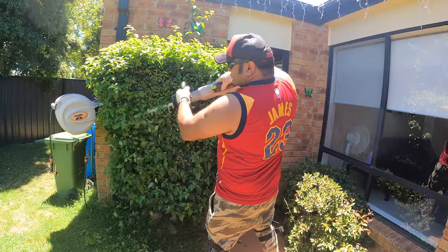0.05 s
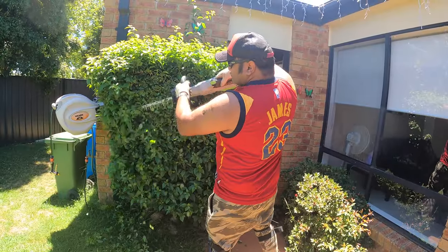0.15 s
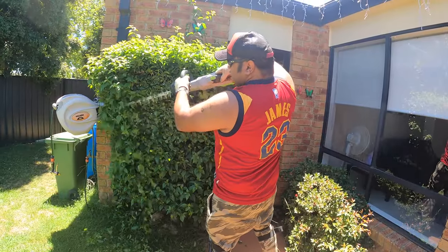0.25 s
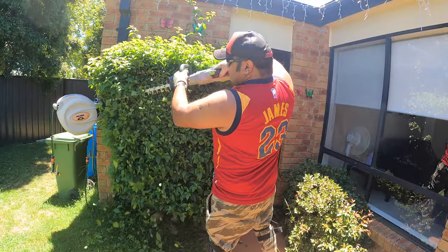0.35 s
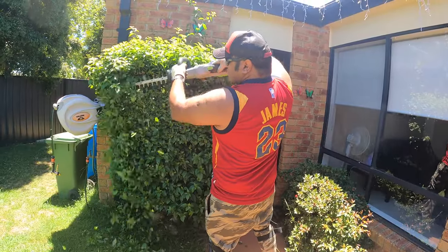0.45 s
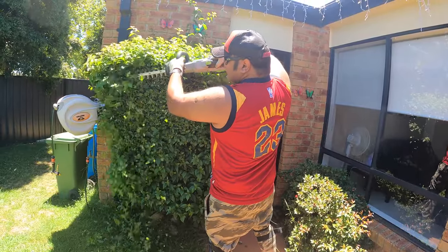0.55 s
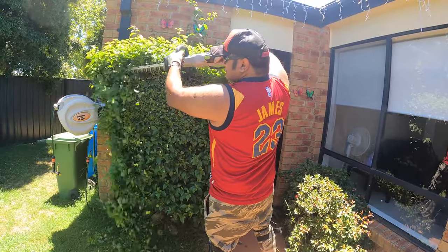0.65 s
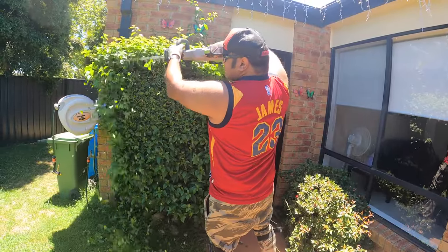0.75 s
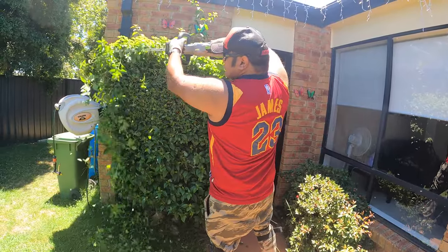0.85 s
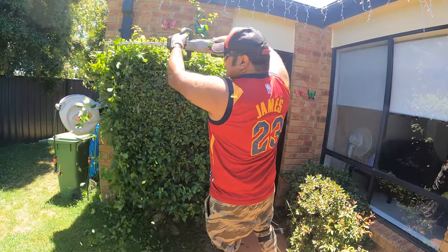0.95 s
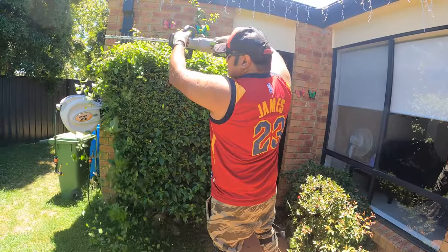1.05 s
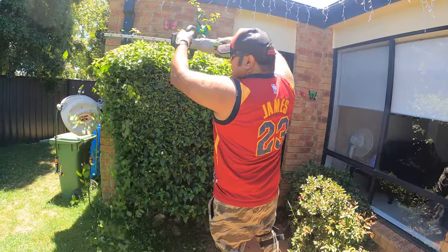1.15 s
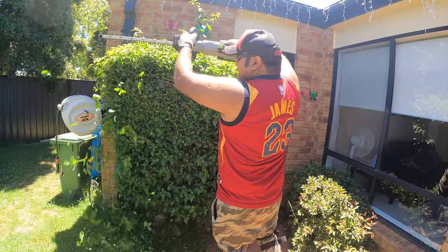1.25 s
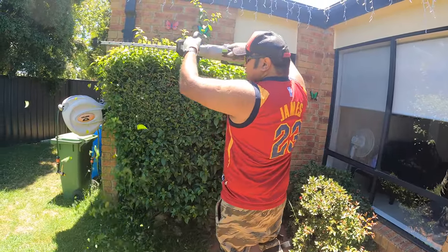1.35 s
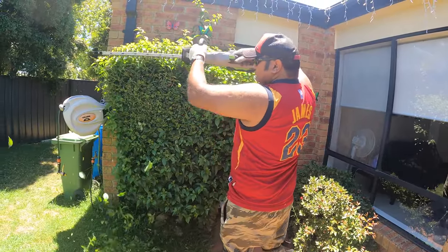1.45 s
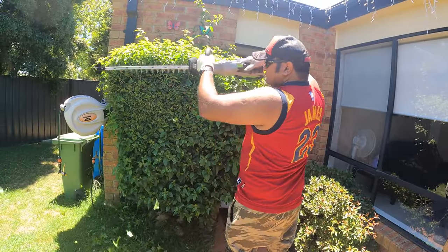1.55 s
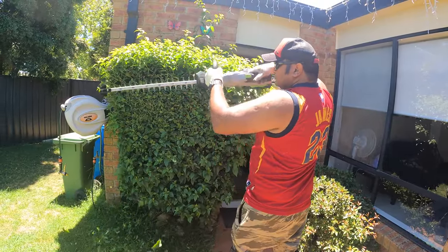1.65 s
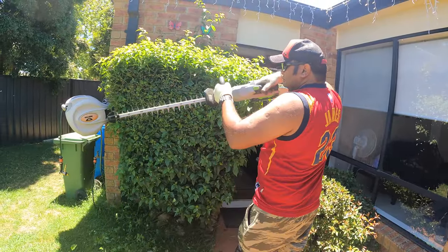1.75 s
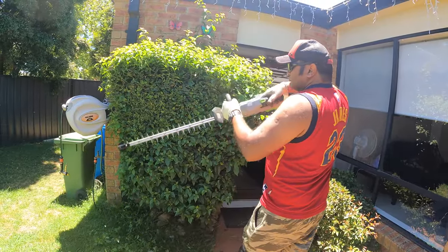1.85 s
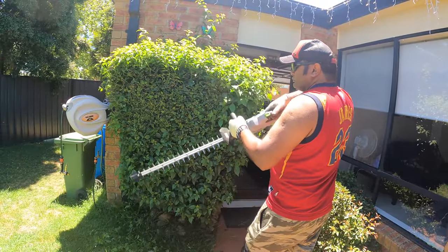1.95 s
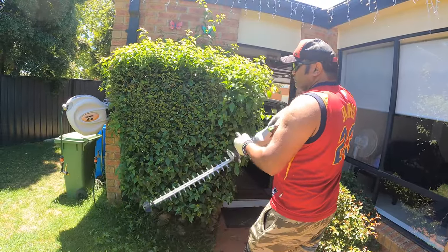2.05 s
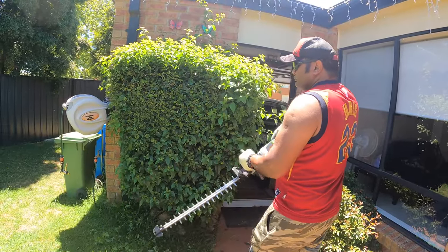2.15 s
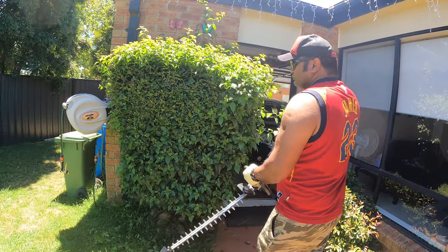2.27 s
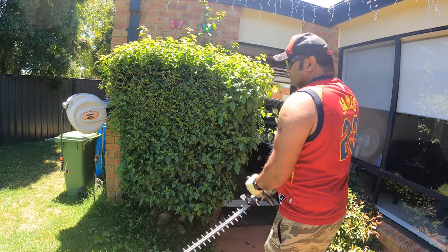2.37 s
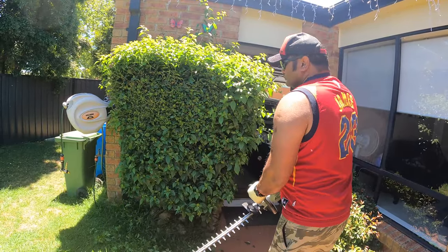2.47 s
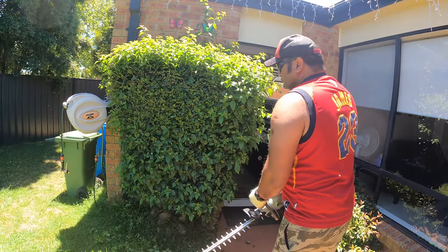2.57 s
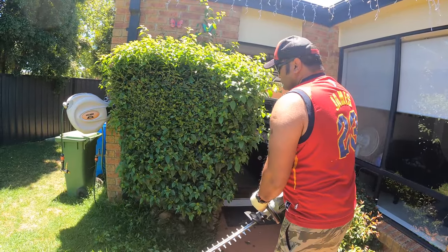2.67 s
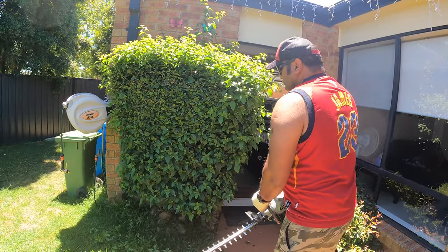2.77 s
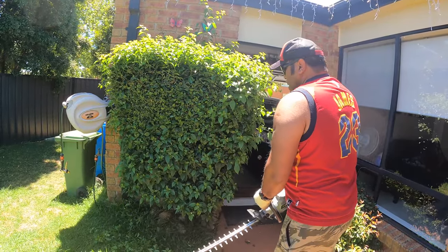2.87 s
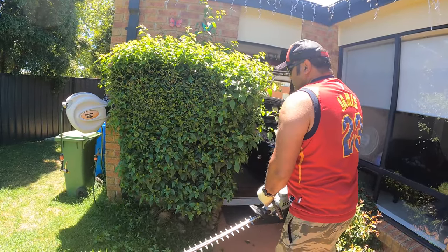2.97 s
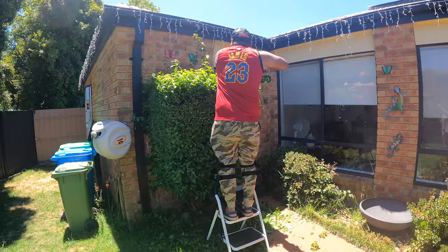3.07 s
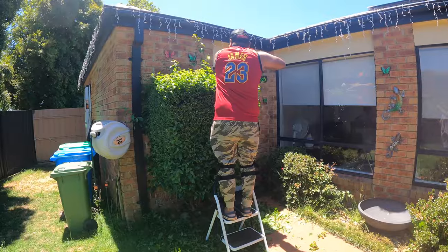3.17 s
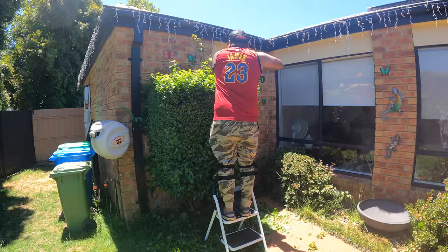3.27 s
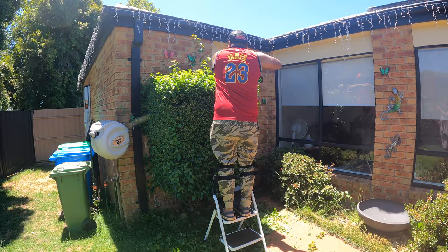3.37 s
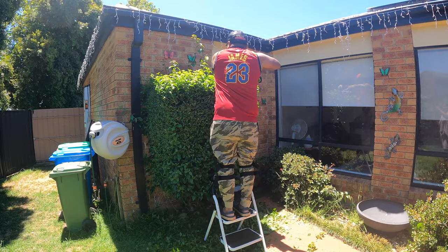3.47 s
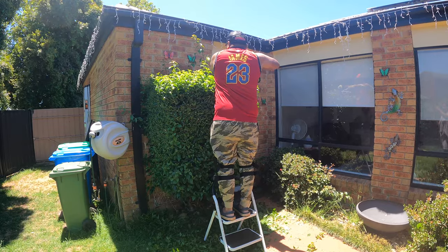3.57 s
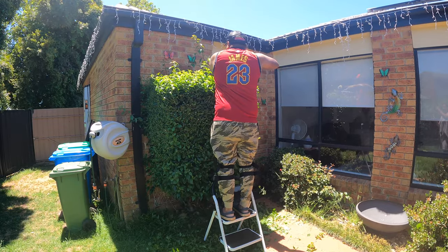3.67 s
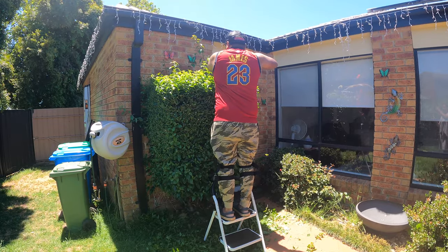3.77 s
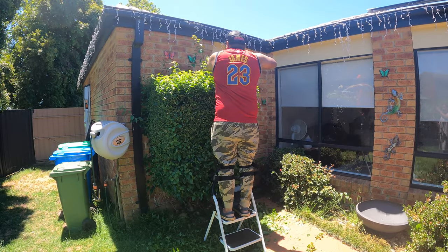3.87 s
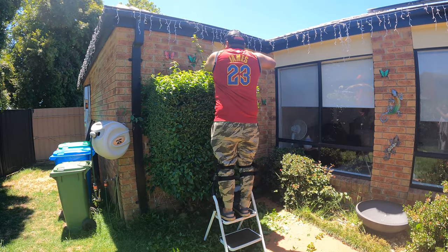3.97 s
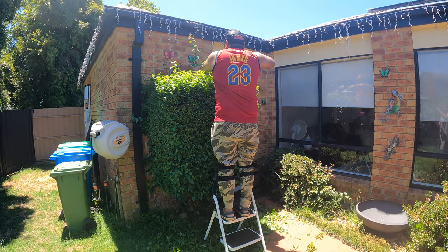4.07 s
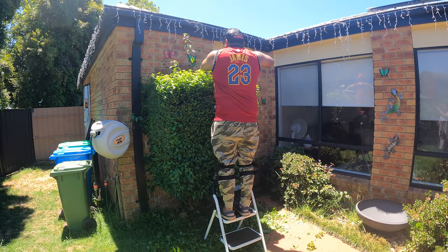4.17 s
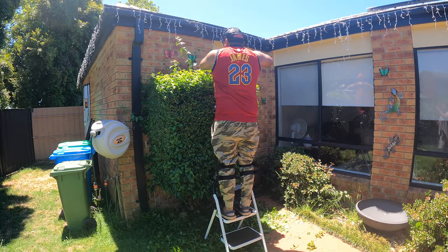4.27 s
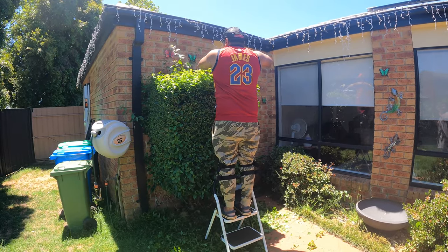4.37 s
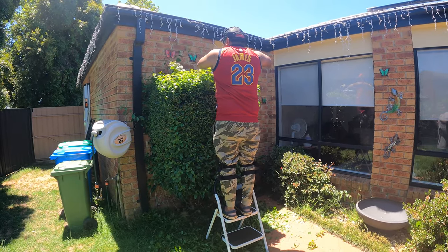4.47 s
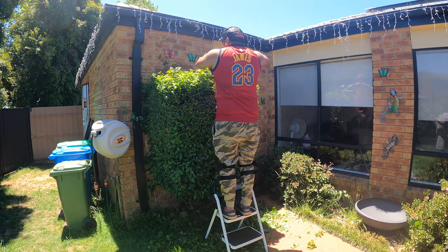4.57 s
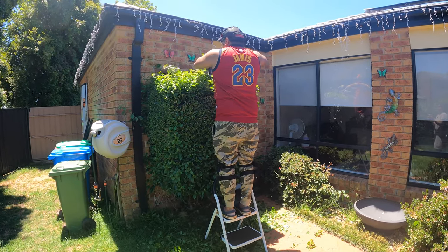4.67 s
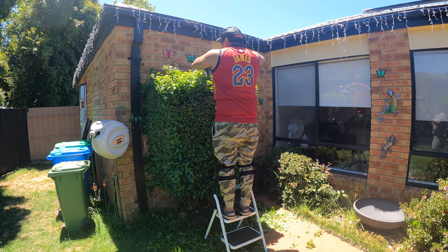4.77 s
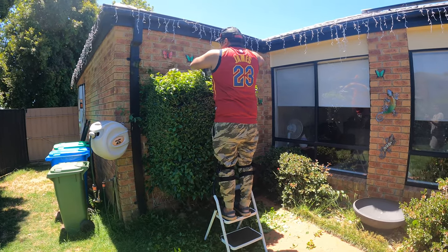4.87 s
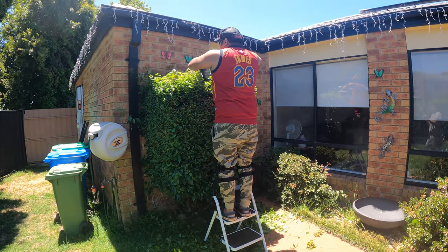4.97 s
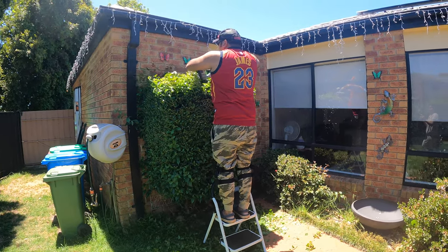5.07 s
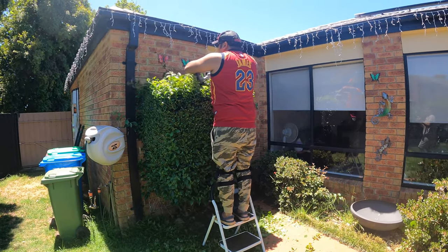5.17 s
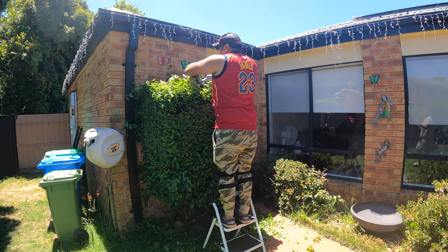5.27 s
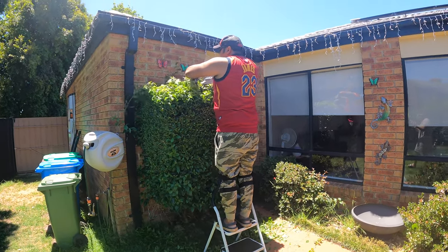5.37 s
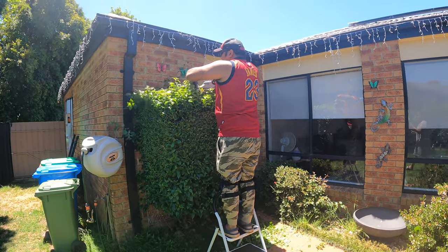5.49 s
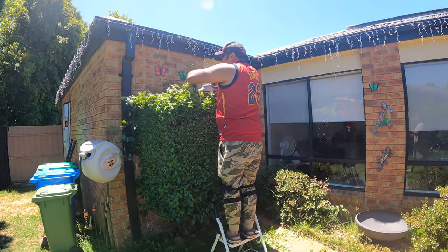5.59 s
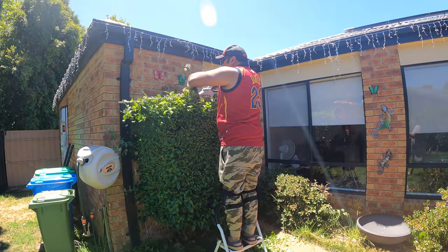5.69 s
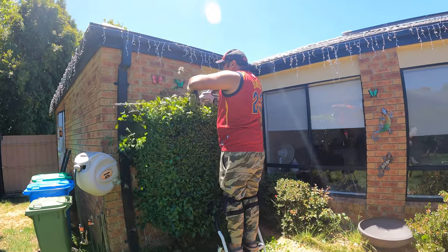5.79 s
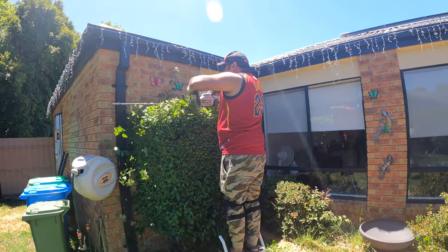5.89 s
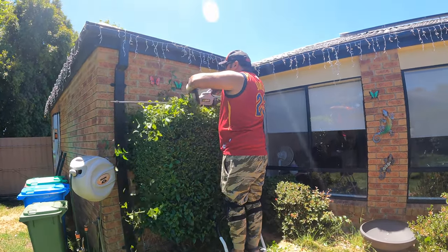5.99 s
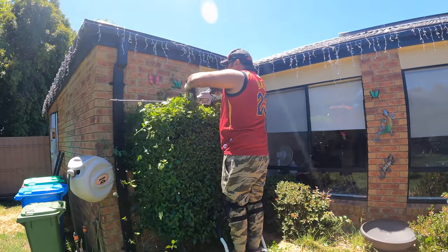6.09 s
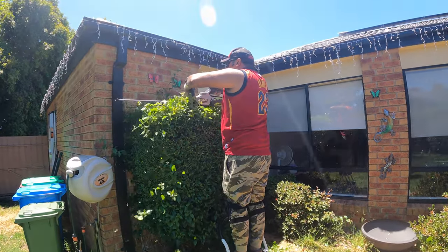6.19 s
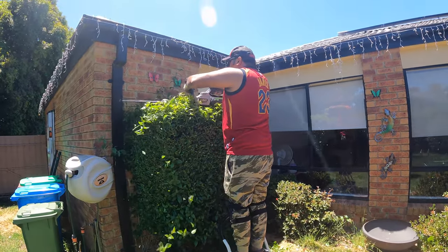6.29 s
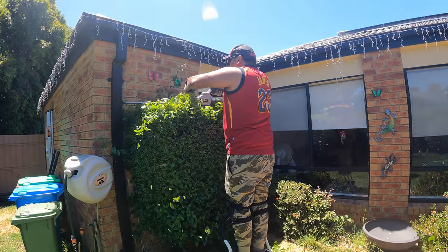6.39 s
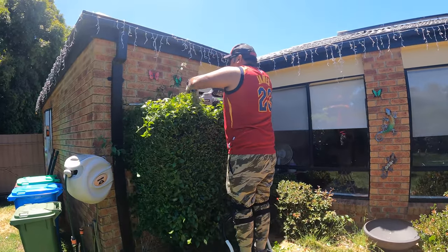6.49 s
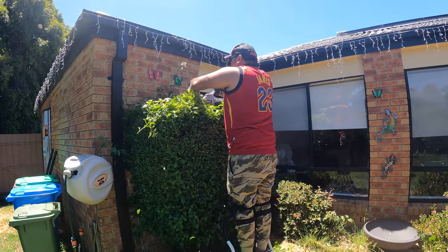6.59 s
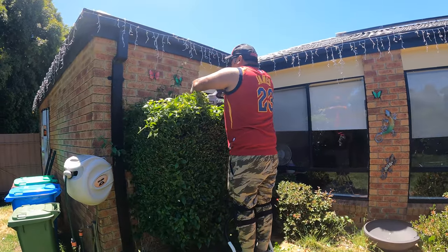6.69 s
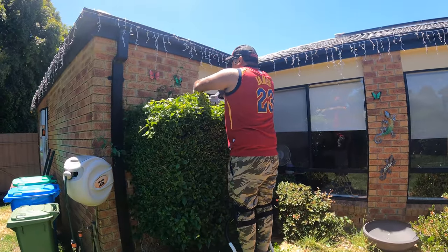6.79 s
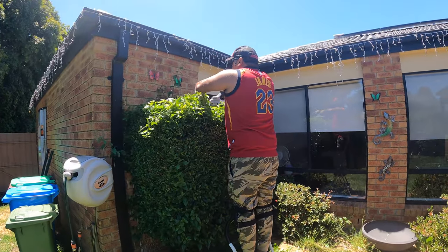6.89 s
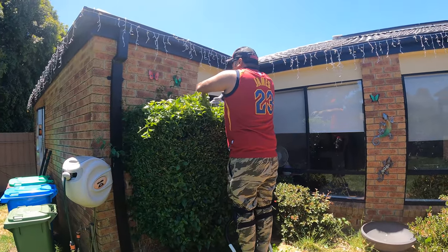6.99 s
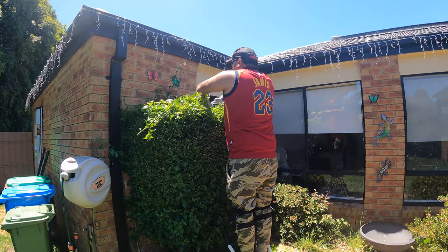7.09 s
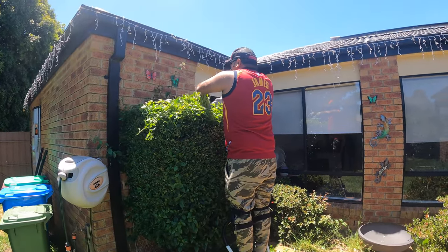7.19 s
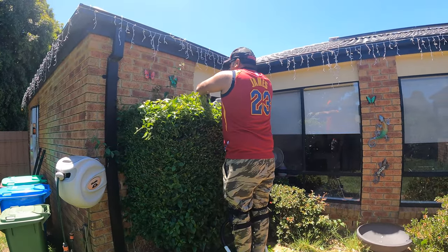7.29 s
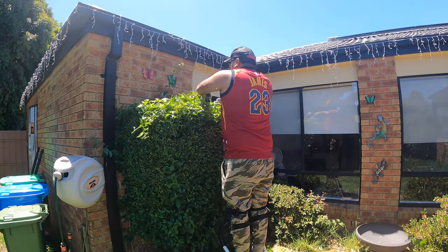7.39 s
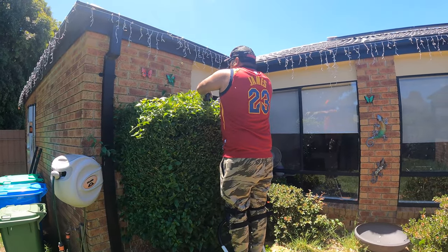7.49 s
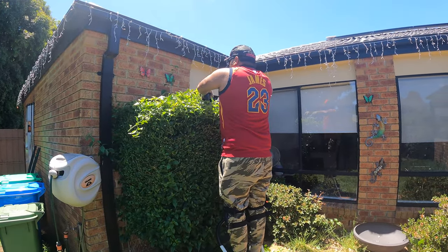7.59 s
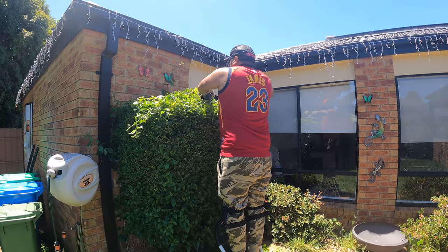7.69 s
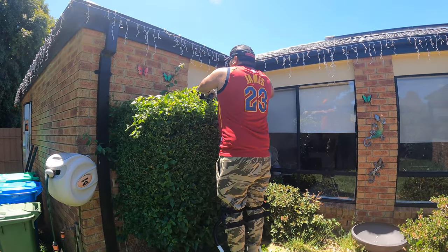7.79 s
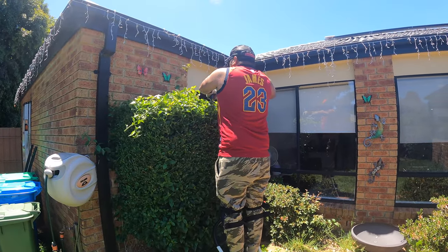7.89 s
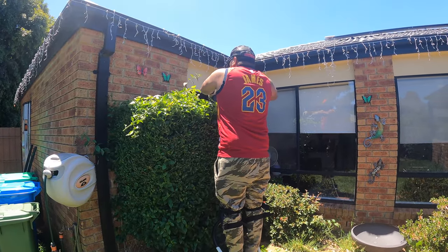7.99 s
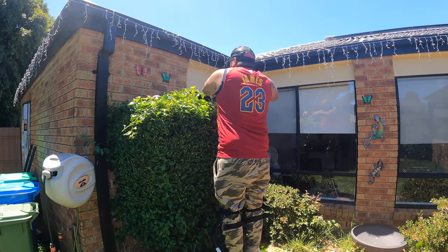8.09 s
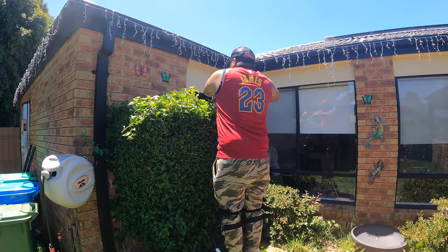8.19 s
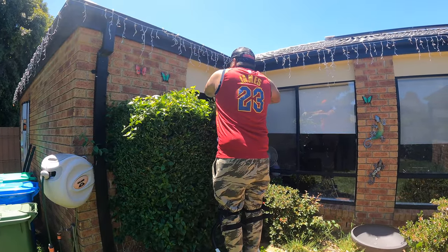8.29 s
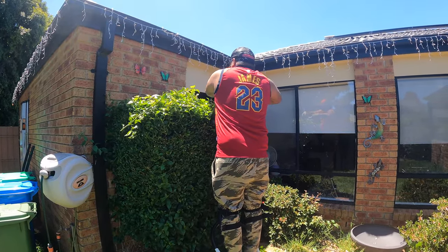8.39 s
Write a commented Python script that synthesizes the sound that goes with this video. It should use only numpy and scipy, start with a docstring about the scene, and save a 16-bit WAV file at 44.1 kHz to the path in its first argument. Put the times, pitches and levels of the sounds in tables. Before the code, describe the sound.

Rapid dry clatter of reciprocating blades and a piercing electric whine, recorded near a brick house wall with short echoes. The motor is released and coasts down within a fraction of a second. A quiet gap follows with rustling leaves, low road rumble and light plastic knocks, then dead silence. The machine returns abruptly, whining more strongly, grinding brightly through foliage and cracking twigs, nearly all in the left channel.

```python
"""A whining motor and rapid steel clatter coast to a stop; leaves swish, traffic murmurs far off and knocks
fall. Then the sound breaks off and the scene changes: a cordless trimmer cuts a hedge by a brick wall, then
from a stepladder. One shaft speed sets motor tones, cooling air and, geared down, the blades, which clack twice
at each reversal. Noise bursts make clacks, twigs and knocks, tiny ticks make leaves, shaped noise makes air and
traffic. Short echoes surround the impacts. Nearly all is on the left; source levels are before the two channel
gains."""
import sys
import numpy as np
from scipy import signal
from scipy.fft import rfft, irfft
from scipy.io import wavfile

SR = 44100
rng = np.random.default_rng(int(sys.argv[2]) if len(sys.argv) > 2 else 0)


def store_wav(level_fs):
    """Save 16-bit WAV to argv[1]."""
    pcm = np.round(np.clip(np.atleast_2d(level_fs), -1, 1) * 32767)
    wavfile.write(sys.argv[1], SR, pcm.T.astype(np.int16))


N = 372644
TIME = np.arange(N) / SR  # s


def amp(db):
    """Decibel law: 20 dB is a factor of ten in amplitude."""
    return 10 ** (np.asarray(db) / 20)


def unit(x):
    """Normalisation: scales to an rms of one."""
    return x / np.sqrt(np.mean(x ** 2) + 1e-20)


def noise():
    """White noise: equal power at every frequency, rms near one."""
    return rng.standard_normal(N)


def sine(hz, phase=0):
    """Simple harmonic motion, with an optional phase in radians."""
    return np.sin(2 * np.pi * hz * TIME + phase)


def curves(rows):
    """Linear interpolation: every column after the time becomes a curve."""
    s, *columns = np.transpose(rows)
    return [np.interp(TIME, s, column) for column in columns]


def swells(rows):
    """Half-sine envelopes: each row of start, length and height is one arch."""
    arches = [height * np.sin(np.pi * np.clip((TIME - s) / length, 0, 1)) for s, length, height in rows]
    return sum(arches)


def dying(s, decay_s):
    """Exponential decay from the instant s."""
    return (TIME >= s) * np.exp(-abs(TIME - s) / decay_s)


def wander(hz):
    """Low-passed noise: slow random variation of rms one, up to about the given rate."""
    gain = 1 / (1 + (np.fft.rfftfreq(N, 1 / SR) / hz) ** 4)
    return unit(irfft(rfft(noise()) * gain, N))


def band(x, lo_hz, hi_hz):
    """Zero-phase band-pass: the part of a sound between two frequencies."""
    return signal.sosfiltfilt(signal.butter(3, [lo_hz, hi_hz], "band", fs=SR, output="sos"), x)


def read(points, hz):
    """Spectrum in dB, interpolated on a log-frequency axis."""
    f, db = np.transpose(points)
    return np.interp(np.log(hz + 1), np.log(f), db)


def coloured(x, points, peaks=(), size=8192):
    """Minimum-phase filtering: a broad spectrum with narrow resonances, none sounding early."""
    hz = abs(np.fft.fftfreq(size, 1 / SR))
    db = read(points, hz)
    for f, width, lift in peaks:
        db = db + lift / (1 + (2 * (hz - f) / width) ** 2)
    spectrum = np.exp(np.conj(signal.hilbert(np.log(amp(db)))))
    response = np.fft.ifft(spectrum).real
    return signal.oaconvolve(x, response[:size // 2])[:N]


# Shaft speed, governed until the motor coasts to rest. Each row: time in seconds, speed in turns per second.
FIRST_SPEED = [(0, 290.4), (.7, 290.2), (1, 292.4), (1.31, 289.5), (1.35, 277), (1.42, 265), (1.56, 143),
               (1.65, 91), (1.67, 0)]
# The second run droops a little at the end. Each row: time in seconds, speed in turns per second.
SECOND_SPEED = [(3.26, 290.3), (8.28, 290.3), (8.38, 287.7)]
# Clatter on the ground, then from the ladder. Each row: frequency in Hz, filter gain in dB.
GROUND_COLOUR = [(50, -37), (140, -25.5), (250, -19.5), (400, -8), (950, -4), (1250, -5), (1600, -0.5),
                 (2000, -3), (2500, -6), (4300, -6), (5500, -10.5), (7000, -17.5), (10400, -32),
                 (12500, -47), (15500, -49)]
LADDER_COLOUR = [(50, -46.5), (140, -26.5), (250, -23.5), (400, -9), (870, -6), (1230, -6.5), (1480, -4),
                 (1900, 0), (2450, -7.5), (4400, -7), (5400, -11), (7000, -23), (10400, -31), (12500, -44),
                 (15500, -48)]
FIRST_CRANK, SECOND_CRANK = .44, .826  # crank position as each run begins, strokes
GEAR = 6.0255  # shaft turns per blade stroke


def trimmer(speeds, crank, colour, level_db, whine_db):
    """Gear kinematics: one shaft speed sets the tones, the cooling air and the blade strokes."""
    speed = curves(speeds)[0] * (TIME >= speeds[0][0])
    turns = np.cumsum(speed) / SR
    strokes = turns / GEAR + crank
    clatter = blades(strokes, speed, colour, level_db)
    return clatter + cooling_air(speed) + motor(turns, strokes, speed, whine_db)


# Ringing of the steel blades. Each row: frequency in Hz, width in Hz, lift in dB.
BLADE_MODES = [(458, 14, 4), (600, 70, 1.5), (893, 60, 2), (1450, 130, 2), (3620, 60, 2), (4450, 150, 1.5),
               (5350, 300, 2), (6449, 45, 3.5), (7951, 80, 4), (10080, 90, 2), (10450, 150, 3.5),
               (11615, 70, 5)]
# Passes into the hedge and out again. Each row: start in seconds, length in seconds, depth from 0 to 1.
PASSES = [(-.12, 0.66, 0.91), (1.17, 0.31, 0.4), (3.45, 4.74, 0.98)]
# Thick foliage shredded. Each row: start in seconds, length in seconds, thickness from 0 to 1.
FOLIAGE = [(-.2, 0.56, 0.3), (.75, 0.93, 0.24), (5.5, 0.83, 1), (6.2, 0.69, 0.3)]
# The tone balance of the clatter shifts. Each row: time in seconds, share of the shift from 0 to 1.
BALANCE = [(4.9, 0.08), (5.7, .55), (7.4, 0.94)]
# Low body, steel edge, fizz and top treble. Each row: lower edge in Hz, upper edge in Hz.
ZONES = [(200, 1350), (2900, 5900), (5900, 9000), (9000, 17000)]
# Shift of each zone, about its mean while running. Each row: dB at full depth, dB in foliage of
# thickness 1, dB at a full balance shift.
SHADES = [(-3.5, 1, 2.5), (-7, -0.5, -2.5), (-2.5, 8.5, -0.5), (-2, 0.5, 0)]
# The top treble sizzles on the first sweep up the hedge. Each row: start in seconds, length in seconds, dB.
SIZZLE = [(-.25, 1.2, 12)]
BITE_DB = 3.5  # gain of the clatter at depth 1
# about this speed (turns per s) the blades cease to strike hard; the least gain of the clatter
SLACK_SPEED, SLACK_SHARE = 117, 0.16


def blades(strokes, speed, colour, level_db):
    """Impact and friction: clacks, steel rub and hedge rustle, shaded by the load and limp near rest."""
    running, depth = speed > 0, swells(PASSES)
    foliage, balance = swells(FOLIAGE), curves(BALANCE)[0]
    rub = amp(-18.4) * noise()
    rustle = amp(-14) * band(noise(), 60, 1250)
    raw = clacks(strokes, running) + running * (rub + rustle)
    sound = walls(coloured(raw, colour, BLADE_MODES))
    middle = band(sound, 1400, 2700)[running]  # reference for the level
    shades = [depth_db * depth + foliage_db * foliage + balance_db * balance
              for depth_db, foliage_db, balance_db in SHADES]
    shades[-1] += swells(SIZZLE)
    for shade, zone in zip(shades, ZONES):
        gain = amp(shade - shade[running].mean())
        sound = sound + band(sound, *zone) * (gain - 1)
    vigour = speed ** 6 / (speed ** 6 + SLACK_SPEED ** 6)
    vigour = np.maximum(vigour, SLACK_SHARE)
    level = amp(level_db + BITE_DB * depth + 0.34 * wander(hz=5))
    return level * vigour * sound / middle.std()


# One to-and-fro of the blades. Each row: place in strokes, strength in dB, decay in ms.
CLACKS = [(-.21, -1.5, 1.8), (0.029, 0, 1.8), (.78, -1.5, 2.1), (1.02, .3, 3.1)]
# Knock of the gear case. Each row: frequency in Hz, decay in ms, relative level in dB.
GEAR_CASE = [(997, 1.45, -4), (1517, 2, -12), (1905, 1.23, 0.5)]


def clacks(strokes, running):
    """Impact excitation: play closes, then teeth meet; each blow chatters and rings the gear case."""
    force, knock = np.zeros(N), np.zeros(N)
    ms = np.arange(SR // 20) * 1e3 / SR
    ring = sum(amp(db) * np.exp(-ms / decay_ms) * np.sin(2 * np.pi * hz * ms / 1e3)
               for hz, decay_ms, db in GEAR_CASE)
    cycles = np.arange(0, strokes[-1] + 2, 2)  # two strokes to and fro
    for place, db, decay_ms in CLACKS:
        # random lateness in strokes and strength in dB
        late, size_db = (rng.standard_normal((len(cycles), 2)) * [.012, .8]).T
        at = np.searchsorted(strokes, cycles + place + late)
        blows = np.bincount(at, amp(db + size_db), N + 1)[:N] * running
        pulse = (1 - np.exp(-ms / 1.0)) * np.exp(-ms / decay_ms)  # 1 ms rise
        force += signal.oaconvolve(blows, pulse)[:N]
        knock += signal.oaconvolve(blows, ring)[:N]
    chatter = force * noise()
    return chatter + amp(-13.0) * knock


# Weaker motor tones. Each row: multiple of the shaft speed, mean level in dB at full speed.
WEAK_ORDERS = [(1, -49), (2, -51), (22, -60), (40, -73)]
# The whine fades at times as the tool is swung. Each row: start in seconds, length in seconds, dip in dB.
WHINE_DIPS = [(-.3, 0.59, -6.5), (.2, 0.42, -1), (.56, 0.19, -12), (2.9, 0.94, -4), (4.3, 2.08, -4.5),
              (5.95, 0.93, -4.5)]
SWITCHING_HZ, SWITCHING_DB = 12932, -70.5  # thin tone of the drive, mean level at full speed


def motor(turns, strokes, speed, whine_db):
    """Shaft orders: tones at multiples of the speed, bent and throbbing as the governor hunts and strokes load it."""
    stroke = np.cos(2 * np.pi * strokes)
    sag = 0.022 * stroke
    hunting = .02 * wander(hz=25) + 0.31 * wander(hz=2.73)
    angle = 2 * np.pi * turns + sag + hunting
    level_db = whine_db + swells(WHINE_DIPS) + 0.63 * wander(hz=3.7)
    throb = 1 + 0.061 * stroke + 0.049 * wander(hz=30)
    whine = amp(level_db) * throb * np.sin(10 * angle)  # tenth order
    others = sum(amp(db + 2 * wander(hz=5)) * np.sin(k * angle) for k, db in WEAK_ORDERS)
    switching = amp(SWITCHING_DB + 3 * wander(hz=8)) * sine(SWITCHING_HZ, wander(hz=25))
    # the root of two makes the tone levels rms
    return np.sqrt(2) * (whine + others + switching) * (speed > 0) * (speed / speed.max()) ** 5


# Hiss of the cooling air. Each row: frequency in Hz, filter gain in dB.
AIR_COLOUR = [(3000, -23), (6000, 1), (8000, -3), (10400, -8.5), (11800, -12), (13000, -13.5), (15500, -25)]


def cooling_air(speed):
    """Flow noise: a hiss whose amplitude follows the square of the shaft speed, with the blade resonances."""
    hiss = unit(coloured(noise(), AIR_COLOUR, BLADE_MODES))
    return amp(-45) * (speed / speed.max()) ** 2 * hiss


# The steel sings while it drags through the hedge. Each row: time in seconds, level in dB.
SINGING = [(5.2, -75), (5.5, -54), (5.9, -49), (6.2, -53), (6.4, -58), (6.7, -52), (6.95, -75)]


def singing():
    """Friction-sustained resonance: one narrow blade mode as randomly modulated 6455 Hz."""
    ring = (wander(hz=45) + 1j * wander(hz=45)) * np.exp(2j * np.pi * 6455 * TIME)
    sounding = (TIME > SINGING[0][0]) * (TIME < SINGING[-1][0])
    return amp(curves(SINGING)[0]) * ring.real * sounding


# Twigs cut through. Each row: start in seconds, strength of the burst in dB before its colouring.
TWIGS = [(5.028, -11), (5.214, -21), (5.776, -24), (5.994, -16), (6.086, -25), (7.377, -7), (7.5, -19)]


def twigs():
    """Brittle fracture: thicker stems crack in short bright noise bursts."""
    force = sum(amp(db) * dying(s, decay_s=0.0014) for s, db in TWIGS)
    crack = [(80, -50), (300, -18), (1000, -2), (3500, 1), (7000, -12), (15000, -34)]  # Hz, dB
    return walls(coloured(force * noise(), crack))


# The ping of the blades as they stop: start in seconds, frequency in Hz, level in dB, 60 dB decay in seconds.
LAST_RING = (1.629, 3620, -23, .04)
# The tool is handled. Each row: start in seconds, strength in dB, hardness as the highest Hz.
KNOCKS = [(1.849, -41.5, 2000), (2.5, -45, 1800), (3.055, -32.5, 8800)]
# Resonances of the plastic housing. Each row: frequency in Hz, width in Hz, dB before the width scaling.
HOUSING = [(510, 72, -4), (880, 390, -1.5), (1160, 280, 4.5), (1470, 130, -5.5), (2960, 440, 5),
           (4200, 710, -2), (7000, 1600, -31)]


def handling():
    """Modal resonance: the blades' last ping, and knocks ringing the housing; soft knocks are dull."""
    s, hz, db, t60 = LAST_RING
    ping = amp(db) * dying(s, t60 / np.log(1000)) * sine(hz)
    force = sum(amp(db) * dying(s, decay_s=0.0084) * band(noise(), 100, top_hz)
                for s, db, top_hz in KNOCKS)
    ring = np.zeros(N)
    for f, width, db in HOUSING:
        mode = signal.lfilter(*signal.iirpeak(f, f / width, SR), force)
        ring += amp(db) * np.sqrt(SR / width / 10) * mode  # narrow modes are raised
    return walls(ping + ring)


def walls(x, wet_db=-9, t60=0.2, count=90):
    """Early reflection: scattered echoes of house wall, eaves and ground, shifting as the man moves."""
    out = x
    for place in np.arange(0, N / SR + 1, .5):  # overlapping one-second spans
        delay = rng.uniform(.002, .09, count)
        taps = np.zeros(SR // 10)
        decay = np.exp(-np.log(1000) * delay / t60)
        taps[(delay * SR).astype(int)] = rng.choice([-1, 1], count) * decay
        near = np.flatnonzero(abs(TIME - place) < .5)
        if len(near):
            faded = x[near] * np.cos(np.pi * (TIME[near] - place))
            echo = signal.fftconvolve(faded, taps / np.linalg.norm(taps))
            out = out + amp(wet_db) * np.pad(echo, (near[0], N))[:N]
    return out


def grit(per_s, spread_db):
    """Random impact train: dense tiny blows of uneven size, of rms one."""
    sizes = amp(spread_db * np.minimum(rng.exponential(1, N), 4))
    return unit(sizes * rng.choice([-1., 1.], N) * (rng.random(N) < per_s / SR))


# Leaves brushed and falling. Each row: start in seconds, length in seconds, level in dB,
# brightness in dB per octave, strongest frequency in Hz.
SWISHES = [(1.648, 0.38, -54, -1.5, 2160), (1.808, 0.25, -53.5, 2.5, 2900), (2.024, 0.12, -57, 0.5, 4200),
           (2.053, 0.39, -58, -4.5, 2250), (2.301, .11, -44, -5, 3020), (2.882, 0.38, -58.5, 3.5, 2300)]
# Colour of leaf ticks before the brightness tilt. Each row: frequency in Hz, filter gain in dB.
LEAF_COLOUR = [(300, -14), (1200, 0), (2000, 0), (3500, 0), (6000, -1.5), (9000, -11.5), (15000, -31)]


def leaves():
    """Granular friction: many tiny leaf ticks swell quickly and fade as a swish."""
    out = np.zeros(N)
    for s, length, db, tilt_db, peak_hz in SWISHES:
        u = np.clip((TIME - s) / length, 0, 1)
        colour = [(f, level + tilt_db * np.log2(f / LEAF_COLOUR[0][0])) for f, level in LEAF_COLOUR]
        ticks = coloured(grit(per_s=6000, spread_db=3), colour, [(peak_hz, 500, 7)])
        out += amp(db) * np.sin(np.pi * u ** 0.5) * unit(ticks)
    return out


# Still air of the yard. Each row: frequency in Hz, filter gain in dB.
YARD_COLOUR = [(15, -40), (25, -3), (96, -4.5), (267, -1), (368, -2), (457, -8), (826, -7), (2700, -16.5),
               (3000, -24.5), (3530, -18.5), (15500, -42)]
# A far vehicle draws near and lingers. Each row: time in seconds, level in dB before a 2 dB cut.
TRAFFIC = [(1.72, -58.5), (2.17, -47.5), (3.03, -46.5)]
# Rumble of the road. Each row: frequency in Hz, filter gain in dB.
TRAFFIC_COLOUR = [(60, -30.5), (170, -7.5), (260, -4), (350, -3.5), (480, -8), (800, -6.5), (1200, -15),
                  (3000, -21.5), (8000, -49.5)]
# The traffic hum swells and fades. Each row: start in seconds, length in seconds, gain at the top.
HUM_SWELL = [(1.45, 1.35, 1.34)]


def yard():
    """Broadband ambience: shaped noise for still air and far traffic, with an unsteady low hum."""
    air = amp(-55.5) * unit(coloured(noise(), YARD_COLOUR))
    rumble = coloured(noise(), TRAFFIC_COLOUR, [(353, 38, 5.7), (807, 19, 4.3)])
    road = amp(curves(TRAFFIC)[0] - 2.0) * unit(rumble)
    hum = amp(-59 + 1.4 * wander(hz=2.6)) * sine(146, 0.7 * wander(hz=3.6))
    return air + road + swells(HUM_SWELL) * hum


RELEASE_S, WHINE_FALL_DB_PER_S = 1.325, 700  # the trigger is let go and the whine dies with the current


def scene():
    """Superposition: both runs and the pause add up, almost wholly on the left."""
    released_db = -WHINE_FALL_DB_PER_S * np.maximum(TIME - RELEASE_S, 0)
    first = trimmer(FIRST_SPEED, FIRST_CRANK, GROUND_COLOUR, level_db=-27.5, whine_db=-28.5 + released_db)
    second = trimmer(SECOND_SPEED, SECOND_CRANK, LADDER_COLOUR, level_db=-28.5, whine_db=-25.0)
    mono = first + second + singing() + twigs() + handling() + leaves() + yard()
    return amp([[5.2], [-15.3]]) * mono  # left and right gains


# The sound breaks off and fades back in as the scene changes. Each row: time in seconds, gain.
BREAK = [(3.064, 1), (3.073, 0), (3.262, 0), (3.29, .14), (3.305, .45), (3.345, 1)]


def record(dry):
    """Saturation and band limiting: the silent change of scene, soft rounding of peaks, then a low-pass."""
    x = dry * curves(BREAK)[0]
    x = x / (1 + (x / .9) ** 6) ** (1 / 6)
    low_pass = signal.firwin(511, 15750, window=("kaiser", 9), fs=SR)
    return signal.oaconvolve(x, low_pass[None], "same")


dry = scene()
out = record(dry)
store_wav(out)
```